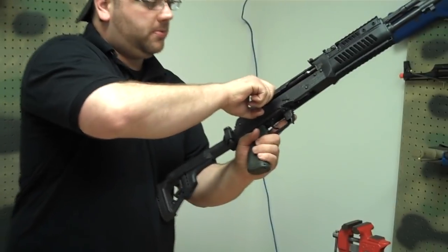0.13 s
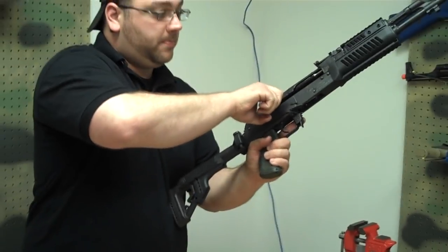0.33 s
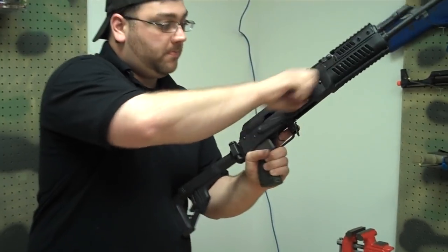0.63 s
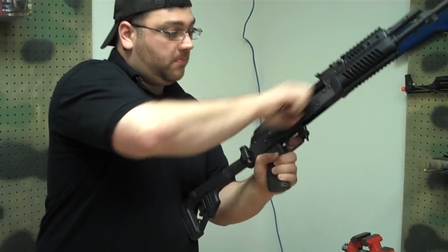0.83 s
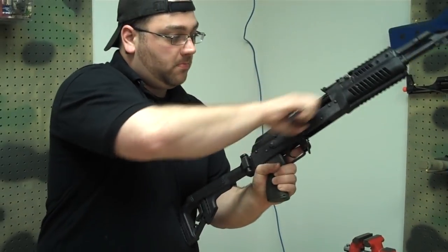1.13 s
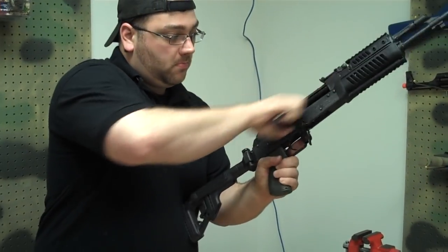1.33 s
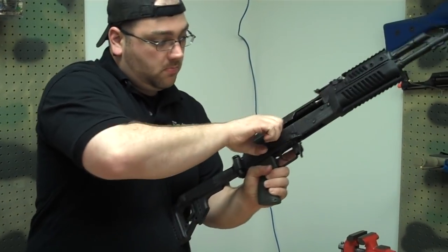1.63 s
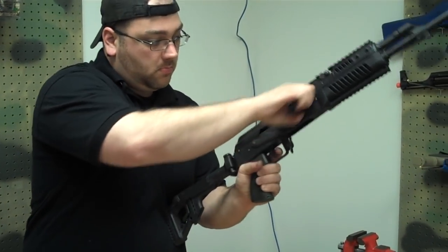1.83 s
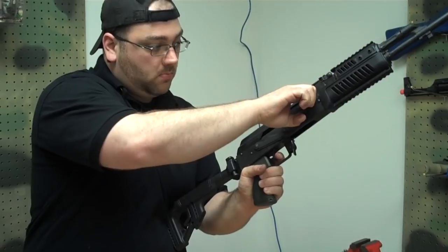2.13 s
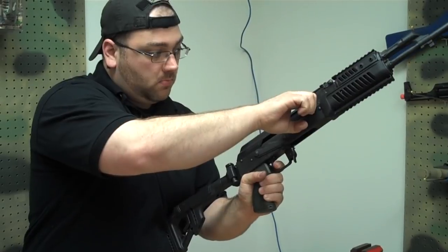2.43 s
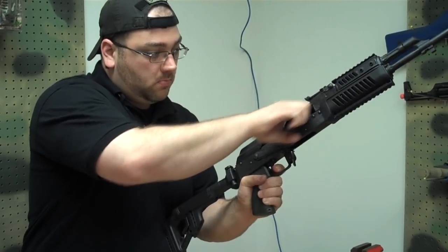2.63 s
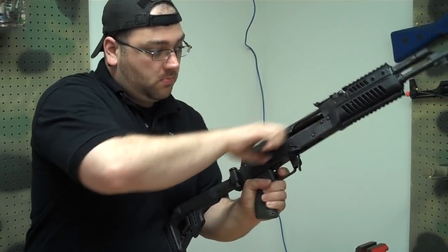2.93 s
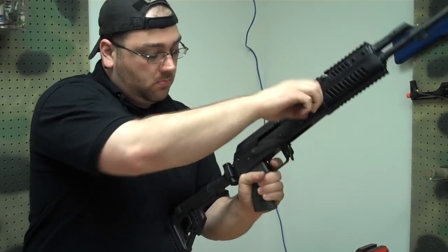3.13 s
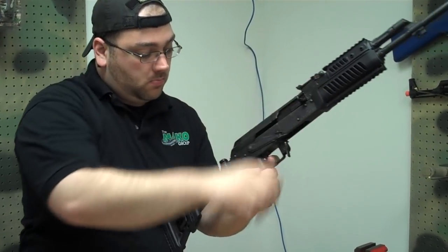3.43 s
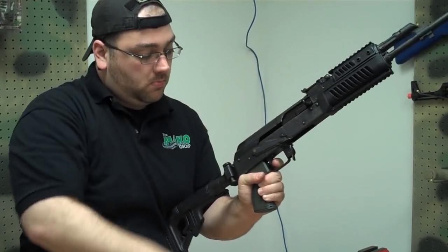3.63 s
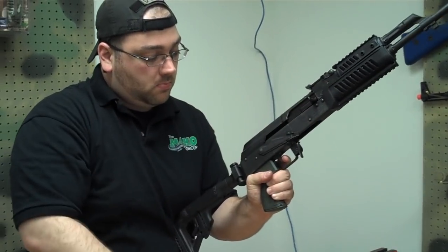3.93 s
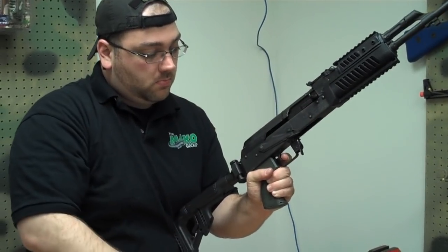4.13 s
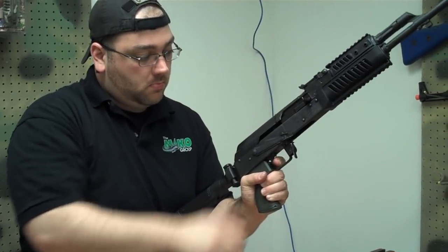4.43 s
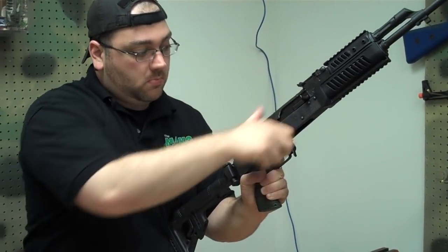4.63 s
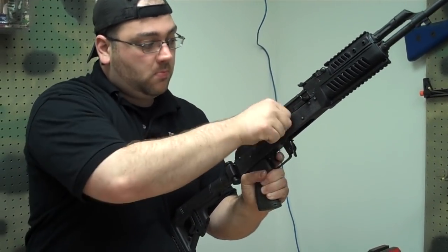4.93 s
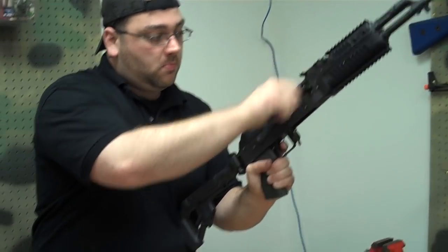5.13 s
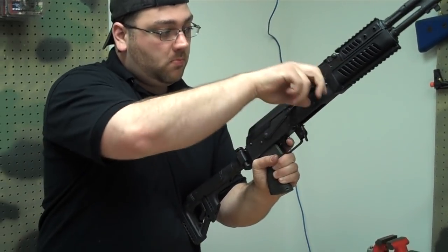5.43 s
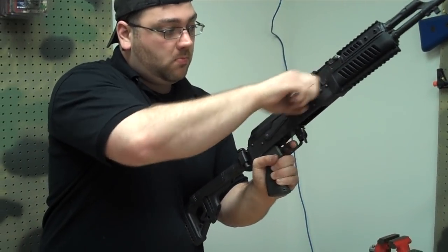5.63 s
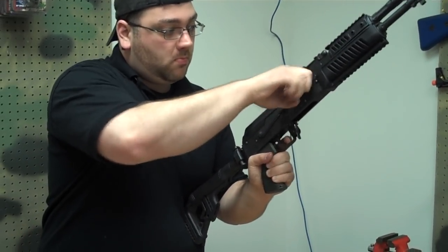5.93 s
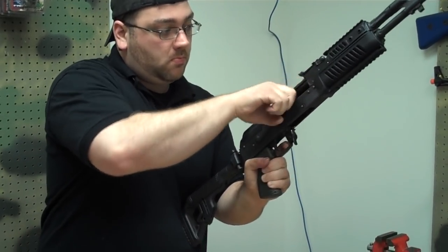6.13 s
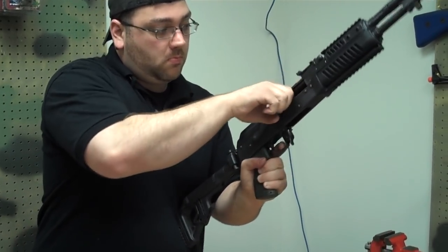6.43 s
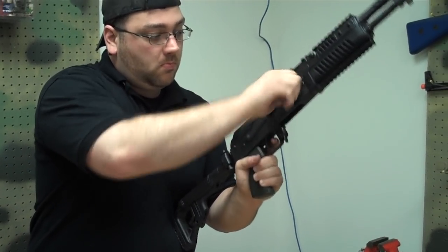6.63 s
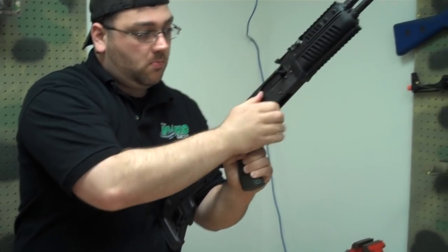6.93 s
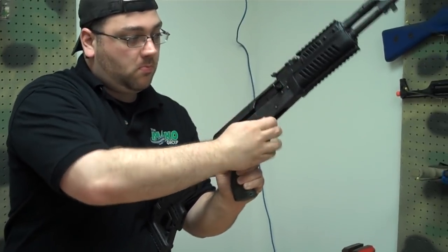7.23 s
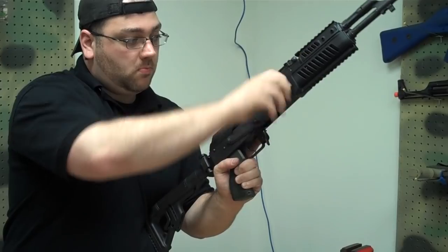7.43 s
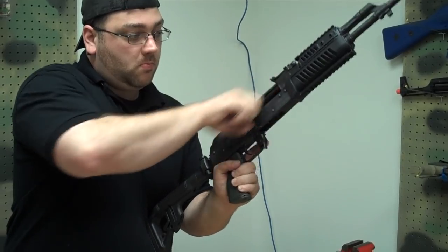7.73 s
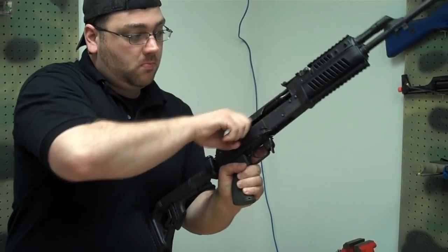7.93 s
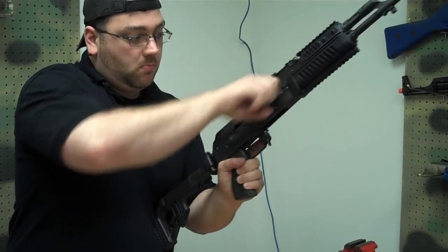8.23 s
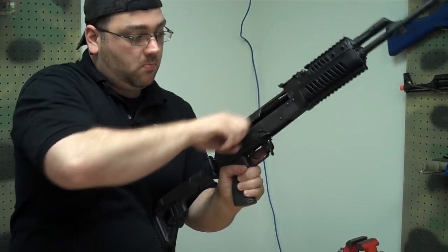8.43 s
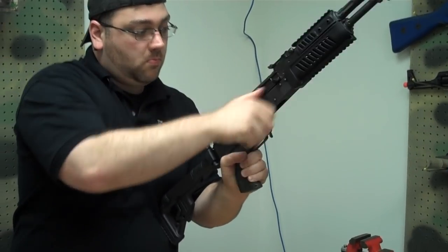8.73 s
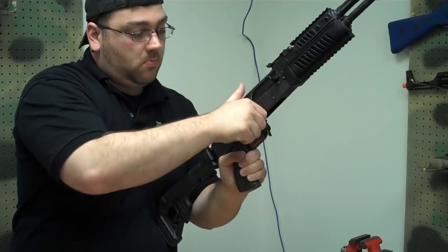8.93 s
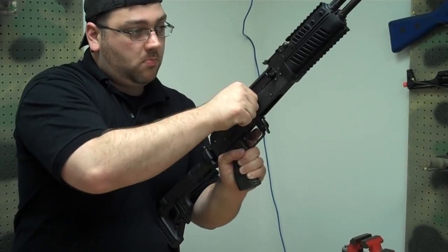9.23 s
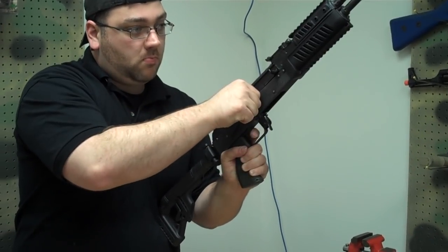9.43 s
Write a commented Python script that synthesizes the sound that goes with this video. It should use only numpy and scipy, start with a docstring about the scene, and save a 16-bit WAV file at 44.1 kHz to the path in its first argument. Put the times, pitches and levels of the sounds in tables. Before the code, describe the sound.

A rifle's bolt carrier is pulled back and snaps forward several times, scraping on its rails and clacking sharply against its stops. In the middle, a few separate clacks of the safety lever and hammer sound between pauses. Then two more quick bursts of racking follow, and one last click. The microphone is a step away in a small, quiet room, and some loud clacks carry a short low thump.

```python
"""A steel rifle action, worked by hand in a small room, a step from a camera microphone.
The bolt carrier scrapes along its rails and knocks at catches and stops; lever and hammer clack alone.
Every blow chatters briefly, rings the receiver and fills the room.
At some loud clacks there is a short, dry low thump, like an overloaded microphone.
Far underneath lie room tone, microphone hiss and a few faint tones."""
import sys
import numpy as np
from scipy import signal
from scipy.fft import rfft, irfft
from scipy.io import wavfile
from scipy.ndimage import uniform_filter1d

SR = 44100
rng = np.random.default_rng(int(sys.argv[2]) if len(sys.argv) > 2 else 0)


def wrap_up_sound(samples):
    """Save the sound to the file named by the first command line argument, as 16-bit audio."""
    columns = np.atleast_2d(samples).T
    # keep every value between -1 and 1, then stretch to whole-number steps
    tamed = np.clip(columns, -1, 1)
    steps = np.round(tamed * 32767).astype(np.int16)
    wavfile.write(sys.argv[1], SR, steps)


N = 422037

# steel on steel: (time [s], strength [dB], brightness [dB/octave], hollow of the receiver [dB])
BLOWS = [(.047, -50, -4.5, 0), (.535, -8, 0, -3), (.559, -6, 1, -0.5), (.63, -13, 2.5, -7),
         (.666, -7.5, 0, -2), (.674, -14, -1.5, -0.5), (.696, -4.5, 4, -3.5), (.716, -6, 0.9, 1.5),
         (.852, -25, 2.5, -5), (.885, -11.5, 3, 7.5), (.947, -14, 3.5, 11.5), (.981, -11.5, -3, 3.5),
         (1.129, -12.5, 0, -5), (1.144, -13.5, -0.5, 5), (1.238, -12.5, 7.5, -13), (1.26, -8.5, 0.9, 0),
         (1.355, -14.5, 1, -5), (1.429, -15, 1.5, 9.5), (1.681, -36, -3.5, 7.5), (1.727, -19, -1, -5.5),
         (1.748, -16, 0, 4.5), (1.841, -19, 2, 3), (1.878, -13, 1.5, 1), (1.899, -7.5, 0.7, 0.2),
         (2.028, -36.5, -1.5, 4), (2.298, -30.5, 4, -1), (2.305, -4.5, 3, 4), (2.66, -51.5, 0, -6.5),
         (2.688, -32, 4.5, 8.5), (2.731, -19.5, 2, 7), (2.843, -8.5, -1.4, 3.5), (2.969, -31, 0, 4.5),
         (3.049, -20, -1, 5), (3.096, -10.5, 1, 3), (3.109, -7.5, 1.5, 4.5), (3.995, -11, 0.2, -1),
         (4.261, -24, -0.5, 0), (4.268, -5.5, 5.5, 3.5), (4.746, -41.5, -2.5, 7), (4.92, -33.5, -6.5, 8.5),
         (4.971, -11, -0.5, 3.5), (5.15, -50.5, -6, 4), (5.254, -38.5, -6, 1.5), (5.598, -46, -8, 2),
         (5.673, -35.5, .3, -4), (5.745, -12, 1, -1.5), (5.924, -19.5, 1.5, -2.5), (5.975, -6, 2, -2),
         (5.998, -7.5, 0.5, -1.5), (6.095, -13, 2, -7), (6.121, -16.5, -3, 2.5), (6.257, -30, -1.3, 0),
         (6.277, -16, 1.5, -3), (6.303, -10.5, 4, 4), (6.409, -12, 1.4, 5), (6.429, -13.5, 0.5, 9),
         (6.54, -31, -4, -6), (6.561, -16.5, 1.1, -15), (6.592, -11.5, 3, -7.5), (6.616, -9, 1.1, 1.5),
         (7.053, -32.5, 0.5, 5), (7.22, -15.5, 1, 10), (7.567, -50.5, -1.5, 3.5), (7.6, -35.5, -5, -4),
         (7.642, -32, -4.5, -1.5), (7.759, -9.5, 1.5, 2), (7.798, -9.5, 1, 2), (7.845, -7.5, 3.5, 6.5),
         (7.866, -3, -2.5, 1.5), (8.021, -29, -0.5, 4), (8.045, -12.5, 0.5, 3), (8.118, -11, 9, 0),
         (8.13, -13.5, 2, -2.5), (8.144, -5, 0.5, 3.5), (8.31, -32, 0.5, 2.5), (8.34, -14.5, 2.5, 6),
         (8.399, -17.5, 4.5, 15.5), (8.421, -8, -2, 6.5), (8.548, -15.5, .7, 6.5), (8.611, -12.5, 1.9, 5.5),
         (8.619, -5, 1.5, 5.5), (9.108, -44.5, -3.5, 3.5), (9.141, -15, -2, 2.5),
         (9.424, -32.5, -0.3, -3.5)]
# colour of a blow: (frequency [Hz], relative level [dB])
STEEL_COLOUR = [(150, -53), (250, -25), (328, -16.5), (377, -19.5), (587, -14.5), (696, -3), (1400, -3),
                (1910, 5), (4250, 0), (5040, 1), (11800, -11), (14000, -24), (14800, -68.5)]
# ringing of the receiver: (frequency [Hz], relative level [dB], t60 [s])
RECEIVER_MODES = [(933, -3, 0.063), (1058, -7.5, 0.086), (1810, -4.5, .05), (2208, -1, 0.099),
                  (2870, -1, 0.11), (4080, -6, 0.024), (5030, -4.5, 0.045), (5670, -10, 0.089),
                  (6970, -2, .04)]
# travel of the bolt carrier: (start [s], end [s], midway level [dB], swell over the stroke [dB])
STROKES = [(.496, 0.553, -36.5, 35), (0.633, 0.717, -30, 8.5), (0.863, 0.994, -36, -0.5),
           (1.104, 1.252, -37, 7), (1.337, 1.449, -38, -8), (1.712, 1.908, -40, 5.5), (2.68, 2.833, -43, 6),
           (2.995, 3.118, -35.5, -8), (5.695, 5.757, -31.5, 3), (5.914, 6.001, -38, 7),
           (6.015, 6.117, -36.5, 18.5), (6.275, 6.433, -38, 13.5), (6.556, 6.623, -38.5, 14),
           (7.699, 7.856, -35, -6.5), (8.04, 8.142, -31, 0), (8.321, 8.42, -38.5, -7.5),
           (8.526, 8.609, -35.5, 2)]
# colour of the scraping: (frequency [Hz], relative level [dB])
RAIL_COLOUR = [(150, -73), (250, -38), (733, -2.5), (2110, 2.5), (3770, -0.5), (5300, -6), (11800, -18),
               (13800, -32), (14800, -60)]
# low thumps, like an overloaded microphone: (time [s], strength [dB])
THUMPS = [(.558, -31), (.697, -21), (.715, -19.5), (1.24, -33.5), (1.899, -35.5), (2.307, -17.5),
          (3.11, -25.5), (3.996, -26), (4.269, -15), (5.998, -24.5), (6.304, -42), (6.616, -42),
          (7.756, -36), (7.8, -33), (7.867, -20), (8.132, -25), (8.144, -21.5), (8.621, -22.5)]
# decay of the small room: (frequency [Hz], t60 [s])
ROOM_DECAY = [(1000, 0.29), (2500, .22), (6000, 0.25), (12000, 0.23)]
# room tone and microphone hiss: (frequency [Hz], noise density [dB])
HISS_COLOUR = [(20, -100), (60, -112), (120, -116), (200, -110), (330, -110), (520, -111), (1070, -112),
               (2400, -118), (7000, -122), (14000, -135)]
# slow drift of the hiss: (time [s], low gain [dB], treble gain [dB])
HISS_DRIFT = [(0, 7, 7), (.45, 10, 4), (1.599, 4, -1.5), (4.701, -1.1, -5.5), (5.3, 7.5, -3),
              (7.001, 3.5, 0.2), (9.001, 1.5, -7), (9.57, 7.5, -3.5)]
# faint lasting tones: (frequency [Hz], level [dB])
HUM_TONES = [(241, -82.5), (1082, -97.5), (3390, -103)]
# a faint tone that comes and goes: (start [s], end [s], first pitch [Hz], last pitch [Hz], level [dB])
PASSING_TONES = [(5.045, 5.601, 422, 458, -80), (8.948, 9.57, 385, 412, -82)]

SIZE = 8192  # samples given to one blow
CHATTER_S, CHATTER_SPREAD_DB = .006, 0.82  # typical length of the chatter, and its spread
HOLLOW_HZ, HOLLOW_OCTAVES = 944, 0.36
RING_DB, ROOM_DB = -11, 1.5  # ring against crack; gain of the echoes
THUMP_S, LONGER_S_PER_DB = .0075, 0.04  # length at strength -15 dB; weaker thumps shrink to 1 ms
TONE_FADE_S, BAND_LIMIT_HZ = 0.05, 14300


def blows():
    """Chattering contacts crack and ring the receiver. Returns the sound at the mic and at the walls."""
    t, hz = np.arange(SIZE) / SR, np.fft.rfftfreq(SIZE, 1 / SR)
    ring_t = t[:4096]
    mode_hz, mode_db, t60 = np.transpose(RECEIVER_MODES)[:, :, None]
    hollow = np.exp(-.5 * (np.log2((hz + 1) / HOLLOW_HZ) / HOLLOW_OCTAVES) ** 2)
    # the plates of the receiver radiate best in broad bands around the modes
    bands = np.exp(-.5 * (np.log((hz + 1) / mode_hz) / 0.057) ** 2)
    low_cut_db = -10 * np.log10(1 + (600 / (hz + 1)) ** 6)
    direct, scattered = np.zeros((2, N))
    for s, strength_db, bright_db, hollow_db in BLOWS:
        chatter_s = CHATTER_S * gain_of(CHATTER_SPREAD_DB * rng.standard_normal())
        noise, unevenness = rng.standard_normal((2, SIZE))
        drive, detune = rng.standard_normal((2, len(RECEIVER_MODES), 1))
        envelope = np.exp(-(t / max(chatter_s, .0005)) ** 1.8) * np.minimum(t / 0.0023, 1)
        contacts = noise * gain_of(2.9 * unevenness) * envelope
        colour_db = bright_db * tilt(hz) + hollow_db * hollow + ((1.9 + 1.7 * drive) * bands).sum(0)
        crack_db = curve_at(STEEL_COLOUR, hz) + colour_db
        crack = unit_rms(coloured(contacts, crack_db))
        # grip and carrier position shift the modes a little from blow to blow
        phase = 2 * np.pi * mode_hz * (1 + .03 * detune) * ring_t
        modes = gain_of(mode_db + 3 * drive - 60 * ring_t / t60) * np.sin(phase)
        struck = signal.fftconvolve(contacts, modes.sum(0))[:SIZE]
        ring = gain_of(RING_DB) * unit_rms(coloured(struck, colour_db + low_cut_db))
        scale = gain_of(strength_db) * 0.27 * np.sqrt(chatter_s * SR / SIZE)  # energy grows with chatter
        add(direct, s, scale * (crack + ring))
        # the walls receive the crack summed over all directions, so its colour is smooth
        smooth_crack = unit_rms(coloured(signal.unit_impulse(SIZE), crack_db))
        add(scattered, s + chatter_s / 2, scale * (smooth_crack + ring))
    return direct, scattered


def scraping():
    """The carrier rubs along its rails in dense clumps of ticks, a few of them large."""
    size, out = 2 * SIZE, np.zeros(N)
    t, hz = np.arange(size) / SR, np.fft.rfftfreq(size, 1 / SR)
    rail_db = curve_at(RAIL_COLOUR, hz) + 2.1 * tilt(hz)
    for start, end, level_db, swell_db in STROKES:
        length = end - start
        push = gain_of(level_db + swell_db * (np.minimum(t / length, 1) - .5))
        push *= np.clip(t / 0.0043, 0, 1) * np.clip((length - t) / 0.00052, 0, 1)
        bands_db = 2.5 * smooth_noise(len(hz), 300)  # no two strokes rub alike
        clumps = gain_of(3.1 * smooth_noise(size, 150))
        ticks = rng.standard_normal(size) * gain_of(4.5 * np.minimum(rng.exponential(1, size), 3.5))
        ticks *= rng.random(size) < .15
        add(out, start, push * unit_rms(coloured(ticks * clumps, rail_db + bands_db)))
    return out


def thumps():
    """Short, dry low thumps at some loud clacks, like an overloaded microphone."""
    t, hz, out = np.arange(SIZE) / SR, np.fft.rfftfreq(SIZE, 1 / SR), np.zeros(N)
    bass_db = -10 * np.log10(1 + (hz / 700) ** 4) - 10 * np.log10(1 + (90 / (hz + 1)) ** 2)
    fade = np.hanning(SIZE // 2)[SIZE // 4:]
    for s, strength_db in THUMPS:
        length = max(THUMP_S + LONGER_S_PER_DB * (strength_db + 15), .001)
        burst = (rng.standard_normal(SIZE) - .15) * np.exp(-(t / length) ** 2)
        thump = unit_rms(coloured(burst, bass_db))[:len(fade)] * fade
        add(out, s, gain_of(strength_db) * 0.5 * np.sqrt(length * SR / SIZE) * thump)
    return out


def room(x):
    """Small-room reverb; four echo patterns fade into one another so the tail has no fixed ring."""
    turn = np.arange(N) / SR / .09  # on to the next pattern every 90 ms
    out = np.zeros(N)
    for pattern in range(4):
        away = abs((turn - pattern + 2) % 4 - 2)
        share = np.cos(np.pi / 2 * np.minimum(away, 1))
        out += signal.fftconvolve(x * share, echoes())[:N]
    return out


def echoes():
    """The near walls return sparse echoes of random sign, each band dying at its own speed."""
    taps = np.zeros(SR // 2)
    slots = np.arange(120, len(taps) - 20, 12)
    taps[slots + rng.integers(0, 12, len(slots))] = rng.choice([-1., 1.], len(slots))
    hz, t, spectrum = signal.stft(taps, SR, nperseg=128)
    decay = gain_of(-60 * t / curve_at(ROOM_DECAY, hz)[:, None])
    tail = signal.istft(spectrum * decay, SR, nperseg=128)[1]
    return tail / np.linalg.norm(tail)


def hiss():
    """Room tone and microphone hiss; the parts below and above about 2 kHz drift separately."""
    t, hz = np.arange(N) / SR, np.fft.rfftfreq(N, 1 / SR)
    spectrum = rfft(rng.standard_normal(N)) * gain_of(curve_at(HISS_COLOUR, hz)) * np.sqrt(SR / 2)
    low_share = 1 / (1 + (hz / 2000) ** 2)
    s, low_db, treble_db = np.transpose(HISS_DRIFT)
    low = gain_of(np.interp(t, s, low_db)) * irfft(spectrum * low_share, N)
    treble = gain_of(np.interp(t, s, treble_db)) * irfft(spectrum * (1 - low_share), N)
    return low + treble


def faint_tones():
    """A hum stays in the background; twice a wavering tone comes in, rises a little and goes."""
    t, out = np.arange(N) / SR, np.zeros(N)
    waver = unit_rms(uniform_filter1d(smooth_noise(N, 1500), 1500))
    for hz, db in HUM_TONES:
        out += gain_of(db + 1.5 * waver) * np.sin(2 * np.pi * hz * t + .3 * waver[::-1])
    for start, end, first_hz, last_hz, db in PASSING_TONES:
        fade = np.clip(np.minimum(t - start, end - t) / TONE_FADE_S, 0, 1)
        hz = np.interp(t, [start, end], [first_hz, last_hz]) * (1 + 0.03 * waver)
        out += fade * gain_of(db + 3.3 * waver[::-1]) * np.sin(2 * np.pi * np.cumsum(hz) / SR)
    return np.sqrt(2) * out


def gain_of(db):
    """Decibels to amplitude."""
    return 10 ** (np.asarray(db) / 20)


def unit_rms(x):
    """Scales to rms 1."""
    return x / np.sqrt(np.mean(x ** 2) + 1e-20)


def smooth_noise(count, width):
    """Noise averaged over width points, at rms 1."""
    return unit_rms(uniform_filter1d(rng.standard_normal(count), width))


def curve_at(points, hz):
    """Interpolates a table on a log-frequency axis."""
    point_hz, value = np.transpose(points)
    return np.interp(np.log(hz + 1), np.log(point_hz + 1), value)


def tilt(hz):
    """Octaves above the middle of the clatter, held flat below the receiver's modes."""
    return np.log2(np.clip(hz, 600, None) / 3000)


def add(mix, s, sound):
    """Mixes a sound in at second s."""
    part = mix[round(s * SR):][:len(sound)]
    part += sound[:len(part)]


def coloured(x, shape_db):
    """Causal filter of the given dB shape on the rfft bins: nothing sounds ahead of a click."""
    cepstrum = irfft(np.maximum(shape_db, -100) * np.log(10) / 20)
    cepstrum[1:len(x) // 2] *= 2
    cepstrum[len(x) // 2 + 1:] = 0
    return irfft(rfft(x) * np.exp(rfft(cepstrum)), len(x))


def scene():
    """In mono: the action a step away, the small room around it, the quiet background."""
    direct, scattered = blows()
    rails = scraping()
    reverb = gain_of(ROOM_DB) * room(scattered + rails)
    return (direct + rails + reverb + thumps() + hiss() + faint_tones())[None]


def record(dry):
    """The camera rounds off peaks, its converter sits slightly off zero, and the top treble is cut."""
    rounded = 0.9 * np.tanh(dry / 0.94) - .0006
    low_pass = signal.firwin(255, BAND_LIMIT_HZ, window=("kaiser", 9), fs=SR)
    return signal.oaconvolve(rounded, low_pass[None], "same")


dry = scene()
out = record(dry)
wrap_up_sound(out)
```